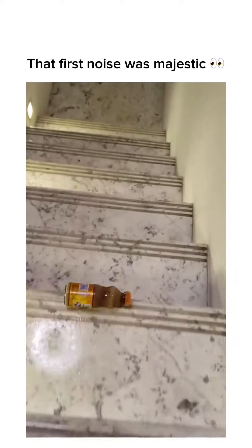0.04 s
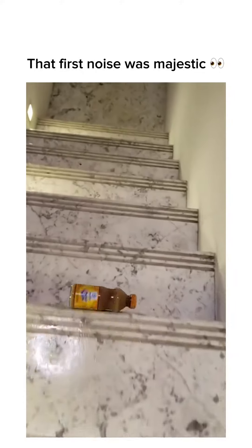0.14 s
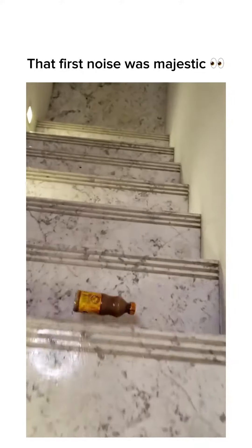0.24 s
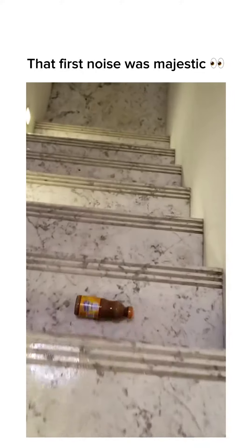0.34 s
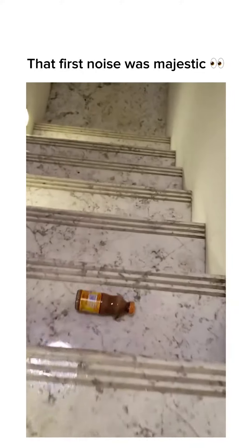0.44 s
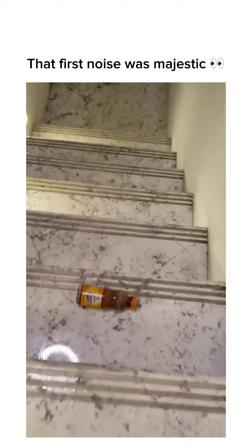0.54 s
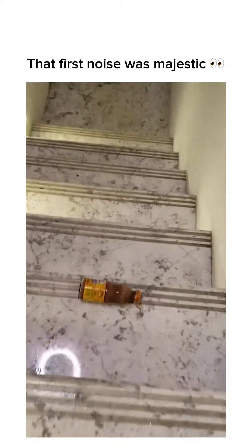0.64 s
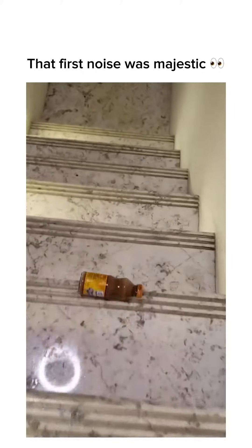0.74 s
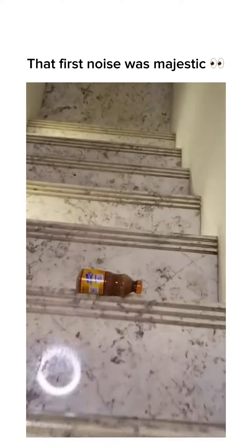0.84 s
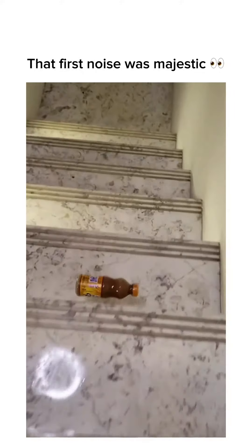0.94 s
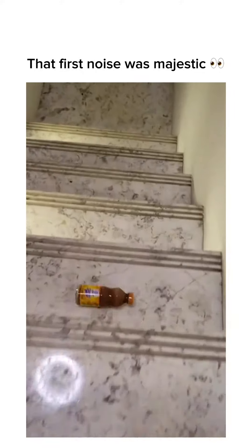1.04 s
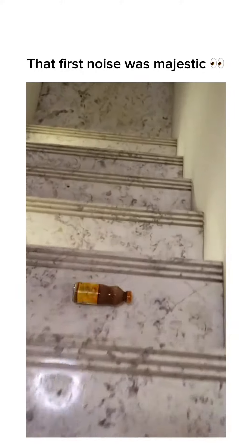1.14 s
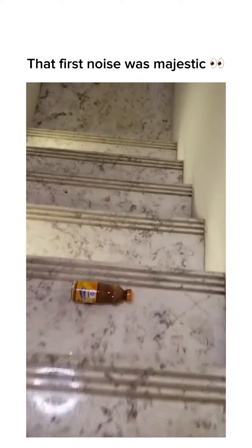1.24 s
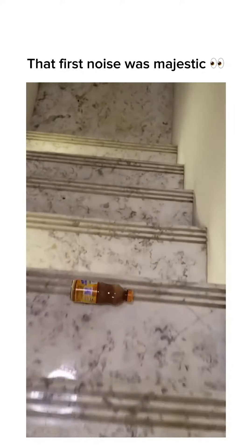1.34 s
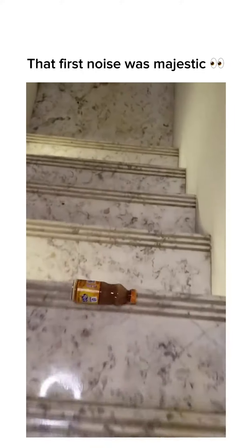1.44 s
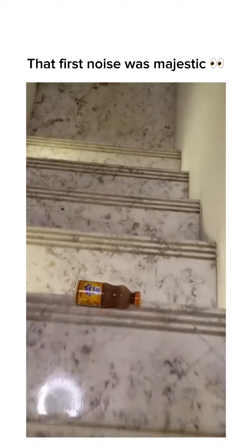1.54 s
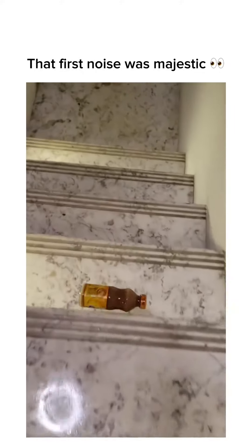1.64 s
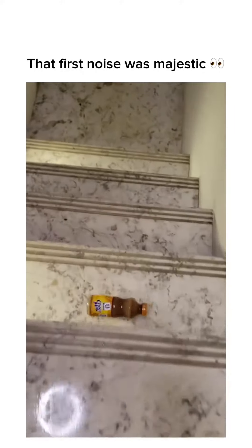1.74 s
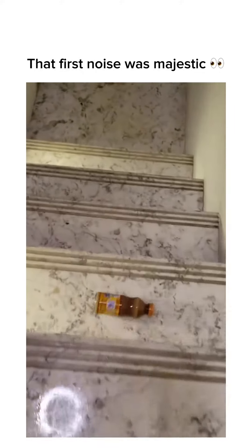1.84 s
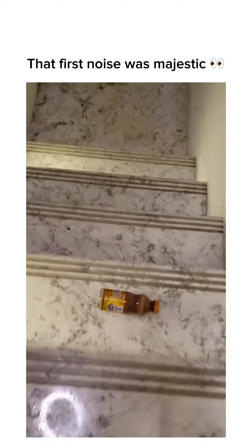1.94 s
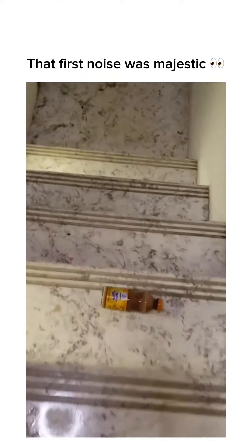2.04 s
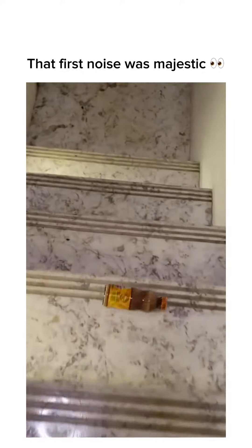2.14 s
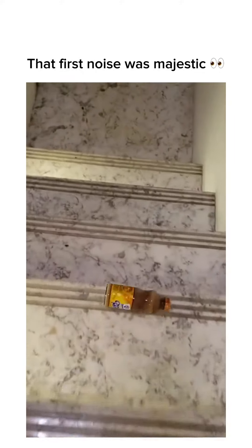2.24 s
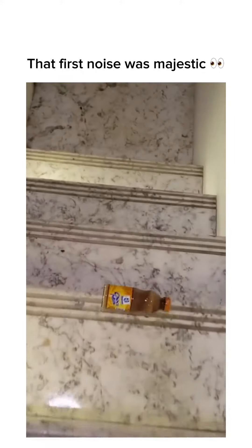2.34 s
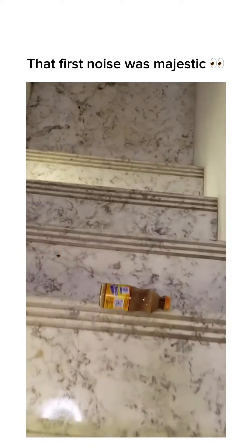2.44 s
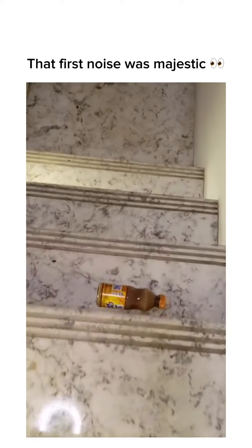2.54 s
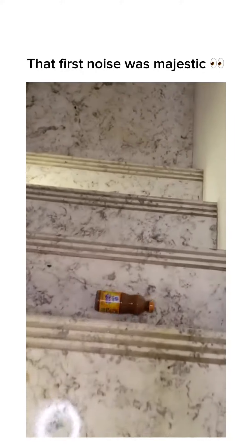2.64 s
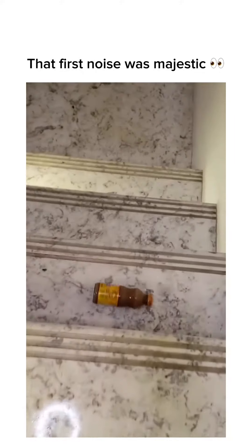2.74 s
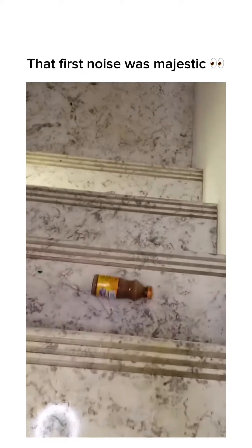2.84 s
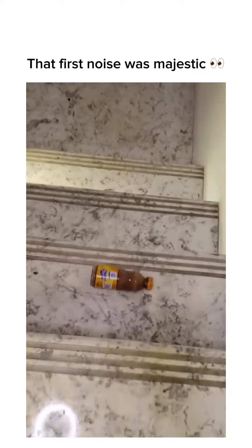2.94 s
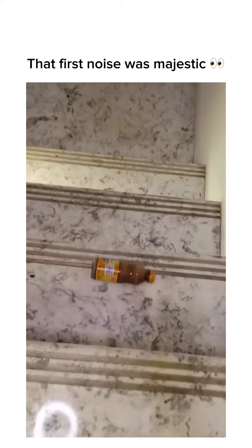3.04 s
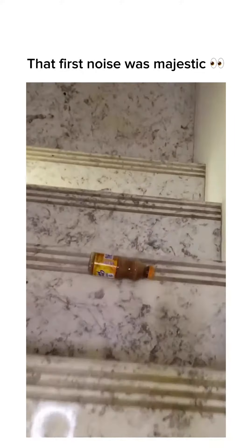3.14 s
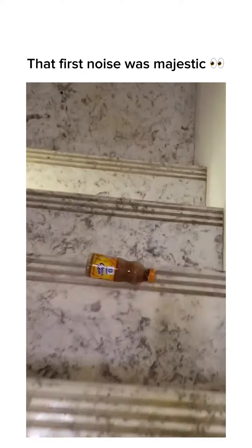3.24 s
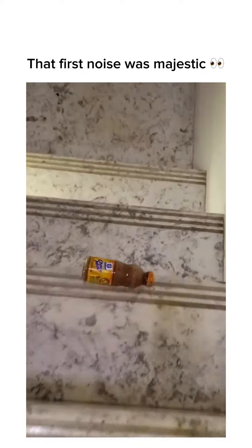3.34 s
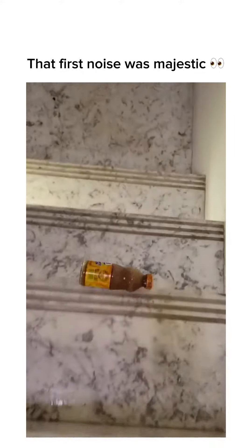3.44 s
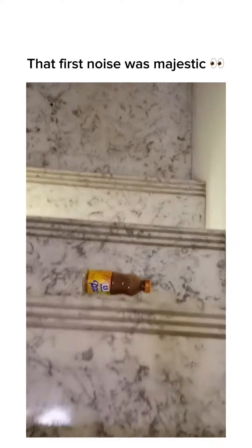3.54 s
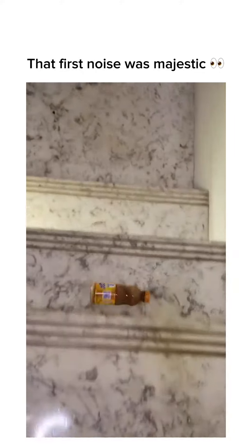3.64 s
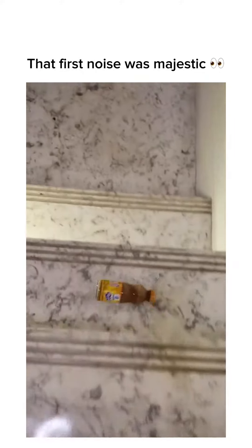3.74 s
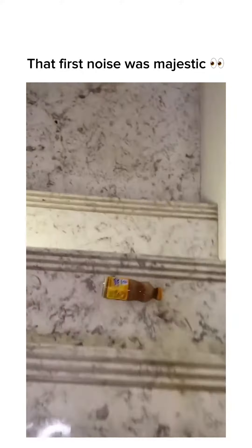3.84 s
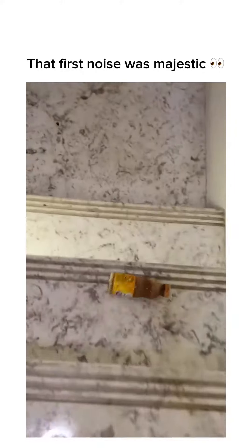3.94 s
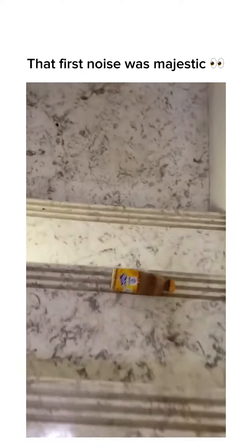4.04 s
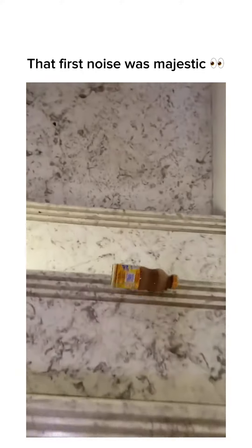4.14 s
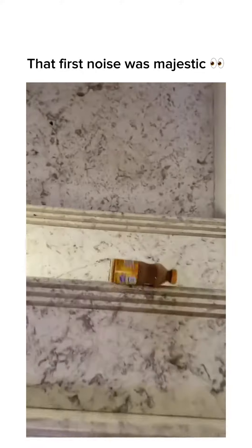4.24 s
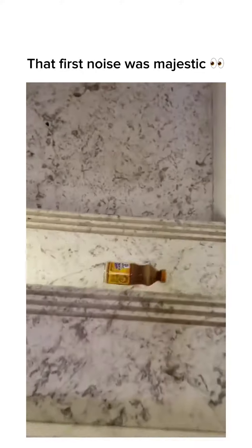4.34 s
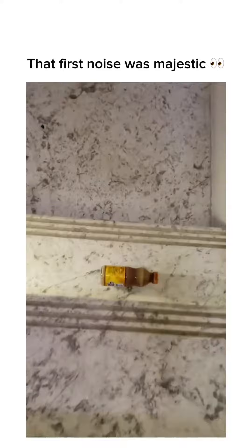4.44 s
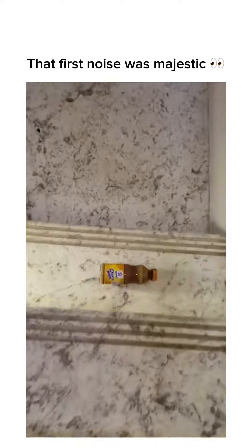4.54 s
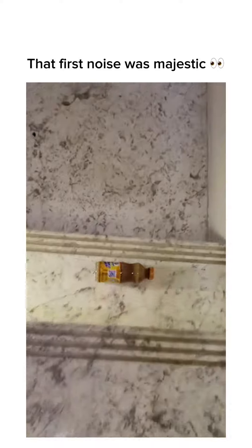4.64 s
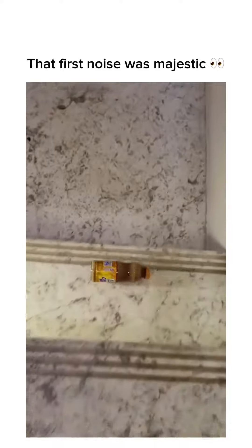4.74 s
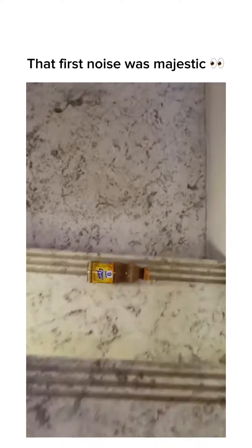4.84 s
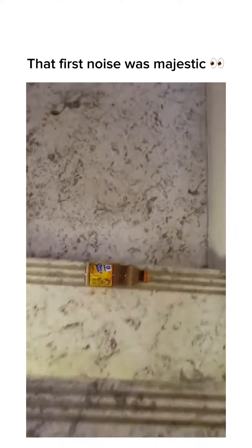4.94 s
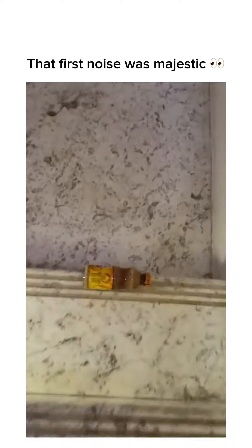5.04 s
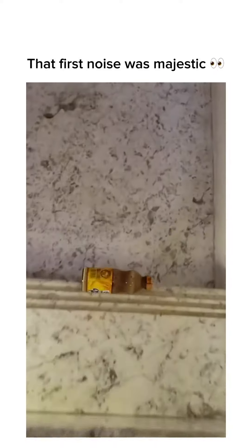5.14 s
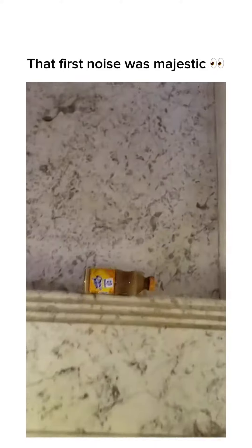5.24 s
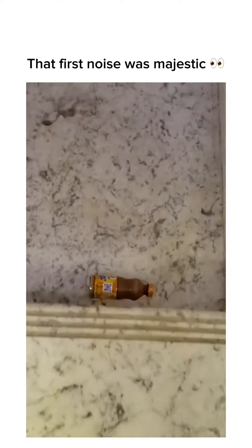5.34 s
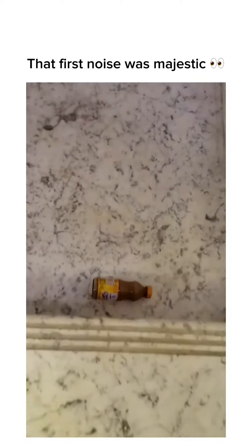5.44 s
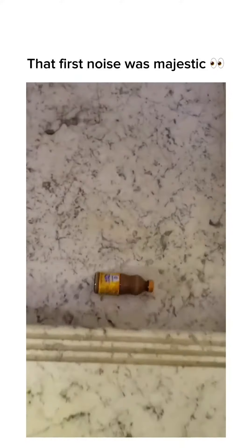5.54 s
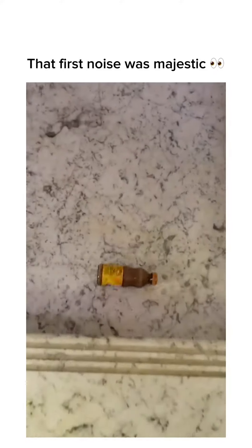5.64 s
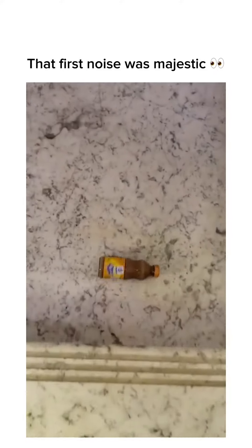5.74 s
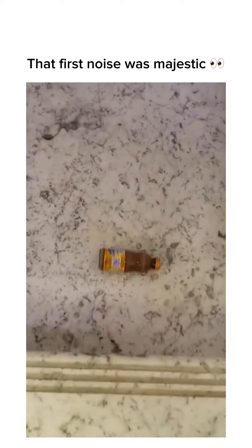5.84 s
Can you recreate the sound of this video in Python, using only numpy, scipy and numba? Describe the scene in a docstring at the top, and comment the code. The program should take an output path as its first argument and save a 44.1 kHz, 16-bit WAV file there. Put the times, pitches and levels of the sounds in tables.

```python
"""A small full glass bottle rolls down marble stairs: each blow is a filtered crack plus damped glass modes.
It lands with one end, then the other, ticks and rumbles over the grooves and rocks at the last edge.
The stairwell answers by convolution with a long bright tail; soft treads are shaped noise bursts.
Two low hums beat over a rumble and faint air noise.
A phone's gain control squeezes every landing and lets the hum creep back."""
import sys
import numpy as np
from scipy import signal
from scipy.io import wavfile
from scipy.ndimage import uniform_filter1d
from numba import njit

SR = 44100
rng = np.random.default_rng(int(sys.argv[2]) if len(sys.argv) > 2 else 0)


def field_ratio(decibels):
    """Amplitude ratio for a level in dB (20 dB per decade); scalars and array-likes work."""
    return 10 ** (np.asarray(decibels, dtype=float) / 20)


def to_wav(sig):
    """Store sig (one row per channel, or 1-D mono) as 16-bit WAV at the path in sys.argv[1].

    Samples outside -1..1 are clipped; the rate is SR.
    """
    pcm = np.clip(np.atleast_2d(sig), -1, 1) * 32767
    pcm = np.round(pcm).astype(np.int16)
    wavfile.write(sys.argv[1], SR, pcm.T)  # frames by channels


N = 259744  # samples in the scene
LEAD = 1  # seconds computed before the scene opens, so that an earlier echo can hang over


def read(points, hz):
    """Interpolates (Hz, value) points along a logarithmic frequency axis, as pitch is heard."""
    f, value = np.transpose(points)
    return np.interp(np.log(hz + 1), np.log(f + 1), value)


def evened(x):
    """Normalizes to unit rms, so that a later gain sets the effective level."""
    return x / np.sqrt(np.mean(x ** 2) + 1e-20)


def add(mix, s, sound):
    """Superposes a two-channel sound on the mix at time s, in seconds."""
    part = mix[:, round((s + LEAD) * SR):][:, :sound.shape[1]]
    part += sound[:, :part.shape[1]]


# Coherence of the two channels. Each row: frequency in Hz, left-right likeness from 0 to 1.
COHERENCE = [(60, 0.3), (180, 1), (550, 0.71), (1650, 0.17), (4970, 0.24), (15000, 0.021)]


def noise(length, shape_db):
    """Partly coherent stereo noise by spectral synthesis; shape_db(Hz, s) sets the level."""
    frames = length // 128 + 5
    hz = np.fft.rfftfreq(512, 1 / SR)[:, None]
    a, b, c, d = rng.standard_normal((frames, 257, 4)).T
    same = np.clip(read(COHERENCE, hz), -1, 1)
    left = a + 1j * b
    right = same * left + np.sqrt(1 - same ** 2) * (c + 1j * d)
    spectra = np.array([left, right])
    spectra *= field_ratio(shape_db(hz, np.arange(frames) * 128 / SR))
    return signal.istft(spectra, nperseg=512, noverlap=384)[1][:, :length]


def modes(table, seconds, weight_db):
    """Modal synthesis: dying sines, weighted by how the blow reaches each one."""
    t = np.arange(round(seconds * SR)) / SR
    # each mode strays a little in level (dB) and in relative frequency
    stray = rng.standard_normal((len(table), 2)) * [1.5, .003]
    total = 0
    for (hz, db, t60), (stray_db, detune) in zip(table, stray):
        decay = field_ratio(db + weight_db(hz) + stray_db - 60 * t / t60)
        total = total + decay * np.sin(2 * np.pi * hz * (1 + detune) * t)
    return total


# Colour of the air noise. Each row: frequency in Hz, relative level in dB.
AIR_COLOUR = [(71, -35), (120, -13), (170, -14.5), (209, -12), (1320, -24.5), (3820, -24.5), (5190, -25),
              (5630, -45), (7200, -29), (9990, -30.5), (16000, -23.5)]


def air():
    """Stationary coloured noise: the faint air of the place."""
    rms_db = -42.5
    return field_ratio(rms_db) * evened(noise(N + LEAD * SR, lambda hz, s: read(AIR_COLOUR, hz) + 0 * s))


# Hum levels, before the left-right offset.
# Each row: time in seconds, lower tone rms in dB, upper tone rms in dB, rumble rms in dB.
HUM_LEVELS = [(0, -30, -27, -42.5), (.3, -30.5, -44, -31), (.6, -19, -19, -40), (1.0, -34, -27, -40.5),
              (1.4, -24.5, -43, -35.5), (1.7, -35, -28.5, -46.5), (2.1, -27, -37, -40),
              (2.65, -41, -33, -38.5), (3.1, -27.5, -33.5, -37.5), (3.55, -59, -40, -42.5),
              (4.0, -53, -42, -29.5), (4.3, -50, -43, -41), (4.8, -44, -55, -42), (5.2, -43, -51, -43),
              (5.89, -33, -55, -49)]
# Frequencies of the two steady tones: lower in Hz, upper in Hz.
HUM_TONES = (51.62, 58.58)


def hum():
    """Beating: two close low tones interfere over a band-passed rumble, all stronger on the right."""
    beat_top_s = 0.0654  # a moment at which the two tones add up
    s, *levels_db = np.transpose(HUM_LEVELS)
    t = np.arange(N + LEAD * SR) / SR - LEAD
    band = signal.butter(3, [68, 94], "bandpass", fs=SR, output="sos")
    rumble = evened(signal.sosfilt(band, rng.standard_normal(len(t))))
    tones = [np.sqrt(2) * np.cos(2 * np.pi * hz * (t - beat_top_s)) for hz in HUM_TONES]
    total = sum(field_ratio(np.interp(t, s, db)) * x for db, x in zip(levels_db, tones + [rumble]))
    return total * field_ratio(np.array([[-2.2], [2.2]]))  # left, right dB


# Soft treads. Each row: start in seconds, thud level in dB, thud reference frequency in Hz
# (its spectrum peaks at 0.89 of that), scuff level in dB, jolt of the hand-held phone in dB;
# thud and scuff levels are noise rms before the envelope, the jolt's is its peak.
TREAD_STEPS = [(0.803, -21, 455, -28.5, -13.5), (1.526, -23, 640, -38, -14), (2.262, -36, 636, -22, -13.5),
               (4.943, -30, 710, -31.5, -27)]


def treads(mix):
    """Impact and friction as enveloped noise: a dull thud, a scuff of the sole and a slow jolt."""
    t = np.arange(SR // 4) / SR
    for s, thud_db, thud_hz, scuff_db, jolt_db in TREAD_STEPS:
        thud = evened(noise(len(t), lambda f, u: -6 * np.log2(f / thud_hz + 0.11) ** 2 + 0 * u))
        scuff = evened(noise(len(t), lambda f, u: 3 * np.log2(f / 8000 + .01) + 0 * u))
        jolt = np.sin(np.pi * np.minimum(t / 0.063, 1))[None] ** 2
        add(mix, s, field_ratio(thud_db) * thud * (t / .005 * np.exp(1 - t / .005)))
        add(mix, s, field_ratio(scuff_db) * scuff * (t / 0.0056 * np.exp(1 - t / 0.0068)))
        add(mix, s + 0.0046, field_ratio(jolt_db) * jolt * np.ones((2, 1)))


# Rolling over the grooves. Each row: start in seconds, end in seconds, level in dB before the lumps and fades.
ROLLING_SPANS = [(0.025, 0.148, -32.5), (0.71, 0.904, -29), (1.356, 1.638, -36), (2.147, 2.49, -37),
                 (3.101, 3.496, -40), (4.003, 4.277, -36), (4.877, 5.094, -33.5)]


def rolling(mix):
    """Amplitude-modulated noise: the lumpy low rumble of glass on grooved stone."""
    roll_hz = 640  # reference frequency; the spectrum peaks at 0.93 of it
    for start, end, db in ROLLING_SPANS:
        length = round((end - start) * SR)
        body = noise(SR // 2, lambda f, u: -7 * np.log2(f / roll_hz + 0.071) ** 2 + 0 * u)
        body = evened(body)[:, :length]
        lumps = field_ratio(1.9 * evened(uniform_filter1d(rng.standard_normal(SR), 200))[:length])
        add(mix, start, field_ratio(db) * body * lumps * signal.windows.tukey(length, .6))


# Reverberation time of the stairwell. Each row: frequency in Hz, t60 in seconds.
STAIRWELL_T60 = [(200, 1.38), (600, 1.54), (1400, 1.048), (2500, 0.94), (4000, 0.85), (6000, 0.76),
                 (9000, 0.56), (14000, 0.44)]
# Colour of the echo at its onset. Each row: frequency in Hz, relative level in dB.
ECHO_ONSET = [(200, -10.5), (700, -8), (1500, 0.05), (4000, -1.2), (8000, 17.5), (14000, 16.5)]
# Modes of the stair slabs. Each row: frequency in Hz, relative level in dB, t60 in seconds.
SLAB_MODES = [(198, -20, .3), (382, -8, .35), (581, -6, .3), (766, -7, .3), (1135, -8, .25)]


def stairwell():
    """Reverberation: a tail swells as reflections pile up, lumpy at first, each band dying at its own rate."""
    tail = noise(2 * SR, lambda hz, s: read(ECHO_ONSET, hz) - 60 * s / read(STAIRWELL_T60, hz))
    t = np.arange(2 * SR) / SR
    lumps = evened(uniform_filter1d(rng.standard_normal(2 * SR), 90))
    tail *= (1 - np.exp(-(t / 0.016) ** 2)) * field_ratio(1.9 * lumps * np.exp(-t / 0.83))
    tail /= np.linalg.norm(tail[0])
    # the slabs sing along with the echo at a few low modes
    slab = modes(SLAB_MODES, .6, lambda f: 0)
    singing = signal.fftconvolve(tail, slab[None] / np.linalg.norm(slab), axes=1)[:, :2 * SR]
    return tail + field_ratio(-21) * singing


# Spectrum of stone on glass. Each row: frequency in Hz, relative level in dB.
CRACK_COLOUR = [(88, -114), (150, -8.5), (821, -6), (1900, 4), (3220, 1.5), (3920, 3), (6510, -41.5),
                (10600, -35), (11900, -60), (13400, -28), (16000, -38)]
# Glass modes damped by the drink. Each row: frequency in Hz, relative level in dB, t60 in seconds.
GLASS_MODES = [(1370, -13, 0.061), (2096, -28.5, 0.066), (2500, -4, 0.0034), (3680, -7, .02),
               (3810, 0, .045), (3960, -7, .02), (4040, 4.5, 0.01), (4390, -5, 0.018), (6000, -15, 0.021)]


def knock(tilt_db, ring_db, mode_hz):
    """Impact excitation: a minimum-phase crack plus the bottle's modes, scaled to peak 1."""
    hz = np.fft.rfftfreq(4096, 1 / SR)
    tilt = tilt_db * np.log2(np.maximum(hz, 1600) / 3000)
    log_gain = np.log(field_ratio(np.maximum(read(CRACK_COLOUR, hz) + tilt, -100)))
    # the Hilbert transform of the log gain gives the phase of a causal crack
    circle = np.concatenate([log_gain, log_gain[-2:0:-1]])
    crack = np.fft.ifft(np.exp(circle - 1j * signal.hilbert(circle).imag)).real
    # the spot that is struck favours the modes near mode_hz
    ring = modes(GLASS_MODES, 4096 / SR, lambda f: -np.minimum(40 * abs(np.log2(f / mode_hz)), 24))
    sound = crack / abs(crack).max() + field_ratio(ring_db) * ring
    return sound / abs(sound).max()


AHEAD = 130  # samples of noise before the full blow


def roughened(sound, noise_db):
    """Smearing by convolution: a short noise burst on both sides roughens and softens the knock."""
    lag = np.arange(-AHEAD, AHEAD)
    burst = field_ratio(noise_db) * rng.standard_normal(2 * AHEAD) * np.exp(-abs(lag) / 45)
    burst[AHEAD] = 1
    smeared = np.convolve(sound, burst)
    return smeared * abs(sound).max() / abs(smeared).max()


def strikes(mix, rows, noise_db, echo_db):
    """Linear superposition: each knock is heard direct and convolved with the stairwell."""
    spot_s = .3  # contacts this close share one place on the step, hence one echo tail
    last = -np.inf
    for s, db, tilt_db, ring_db, mode_hz in rows:
        if s - last > spot_s:
            tail = stairwell()
        last = s
        direct = field_ratio(db) * knock(tilt_db, ring_db, mode_hz)
        add(mix, s - AHEAD / SR, roughened(direct, noise_db) * np.ones((2, 1)))
        add(mix, s, field_ratio(echo_db) * signal.fftconvolve(direct[None], tail, axes=1))


# Glass ticking over the grooves at each step's edge.
# Each row: time in seconds, direct peak in dB, favoured mode in Hz.
EDGE_TICKS = [(.014, -8, 2030), (.659, -4, 2500), (.729, -4, 2100), (1.394, 0.5, 2120), (1.525, -21, 2102),
              (1.537, -10.5, 2500), (2.209, -4.5, 2500), (3.143, -14, 2500), (3.235, -9, 2500),
              (3.322, -13, 2500), (4.023, -15, 2500), (4.087, -17, 1412), (4.121, -7.5, 2500),
              (4.168, -10, 2100), (4.837, -23, 2100), (4.879, -13.5, 2100)]


def ticking(mix):
    """Light impacts: small contacts that share one spectral tilt and one strength of ring."""
    tilt_db, ring_db, noise_db, echo_db = -3, -8, -10.5, 15  # tilt is per octave
    rows = [(s, db, tilt_db, ring_db, hz) for s, db, hz in EDGE_TICKS]
    strikes(mix, rows, noise_db, echo_db)


# The bottle rocking at the last edge. Each row: time in seconds, direct peak in dB,
# tilt in dB per octave, glass ring in dB, favoured mode in Hz.
EDGE_ROCKING = [(5.088, -17, -10, -1, 2080), (5.097, -18, -12, -1, 1350), (5.108, -18, -12, 0, 2080),
                (5.120, -21, -12, -2, 1350)]


def rocking(mix):
    """Repeated soft impacts: a falling spectral tilt makes the knocks dull."""
    strikes(mix, EDGE_ROCKING, noise_db=-10, echo_db=18)


# Blows of the glass on stone, two or three a landing. Each row: time in seconds, direct peak in dB,
# tilt in dB per octave, glass ring in dB, favoured mode in Hz.
LANDING_BLOWS = [(.3430, 10.5, -1.5, -3.5, 3650), (.3470, 17.5, 3.5, -21, 2370), (0.358, 14, 0.5, -1, 4200),
                 (1.0607, 13.5, -2.5, 3.5, 2360), (1.0650, 16.5, 3, 4, 4680), (1.073, 6.5, 10.5, -18, 4450),
                 (1.8037, 13.5, 3.5, -5, 2160), (1.8104, 3.5, 0, -16, 3850), (1.8246, 6.5, -1, -1, 3960),
                 (2.6883, 15, 5, -7, 2500), (2.6939, 12, 2, -2, 4040), (3.6691, 13, 0.5, -11.5, 2500),
                 (3.6767, 12.5, 7.5, -8, 4020), (3.6894, 8.5, 3.5, -13.5, 3820),
                 (4.438, 16.5, 4.5, -16, 4060), (4.4429, 7.5, 2.5, -2, 4040), (5.4345, -3, -15, -14, 3800),
                 (5.4367, 12.5, 3, -2, 3800), (5.443, 8.5, 2.5, -6, 4390)]
# A blow before the opening whose echo still hangs: a single row with the same columns.
EARLIER_BLOW = (-0.2442, 12, 3.8, 6, 2300)


def landings(mix):
    """Hard impacts in quick succession: one end of the bottle lands, then the other."""
    strikes(mix, [EARLIER_BLOW] + LANDING_BLOWS, noise_db=-21, echo_db=27.5)


def scene():
    """Superposition of all sources, from the moment the microphone opens."""
    mix = hum() + air()
    treads(mix)
    rolling(mix)
    ticking(mix)
    rocking(mix)
    landings(mix)
    return mix[:, LEAD * SR:]


@njit
def follow(level_db, rise, fall):
    """First-order smoothing with one rate upward and another downward, each a share per sample."""
    out, state = np.empty_like(level_db), level_db[0]
    for i in range(len(out)):
        state += (rise if level_db[i] > state else fall) * (level_db[i] - state)
        out[i] = state
    return out


def low_pass(x):
    """Removes everything above the highest recorded frequency."""
    return signal.sosfilt(signal.butter(12, 16500, fs=SR, output="sos"), x)


def record(dry):
    """Dynamic range compression with look-ahead and a slower bass path, then band limits and a soft ceiling."""
    # the centred average sees a blow slightly before it comes
    power_db = 10 * np.log10(abs(uniform_filter1d((dry ** 2).mean(0), 300)) + 1e-9)
    over_db = np.maximum(power_db + 17.5, 0)  # excess over the threshold
    over_db = follow(over_db, 1 / (0.00022 * SR), 1 / (.06 * SR))  # time constants in s
    # the bass is turned down by a larger share, and more slowly
    bass = signal.sosfiltfilt(signal.butter(2, 150, fs=SR, output="sos"), dry)
    bass_db = .72 * follow(over_db, 1 / (0.0035 * SR), 1 / (.05 * SR))
    ducked = (dry - bass) * field_ratio(-.65 * over_db) + bass * field_ratio(-bass_db)
    ducked = signal.sosfilt(signal.butter(4, 25, "highpass", fs=SR, output="sos"), ducked)
    ducked = signal.sosfilt(signal.butter(12, 15700, fs=SR, output="sos"), ducked)
    finished = 0.99 * np.tanh(ducked / 1.047)
    return low_pass(finished)


dry = scene()
out = record(dry)
to_wav(out)
```